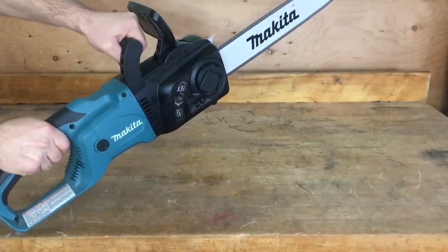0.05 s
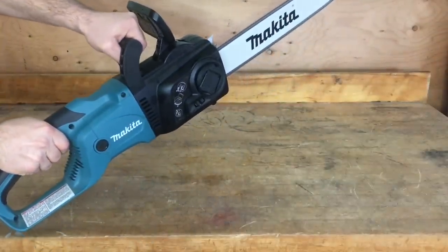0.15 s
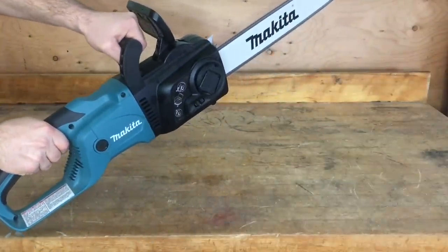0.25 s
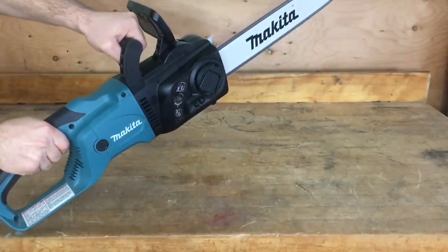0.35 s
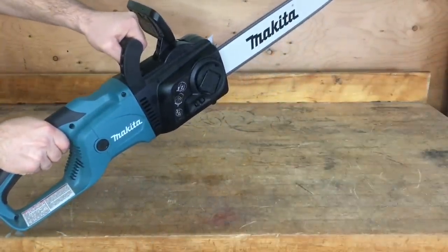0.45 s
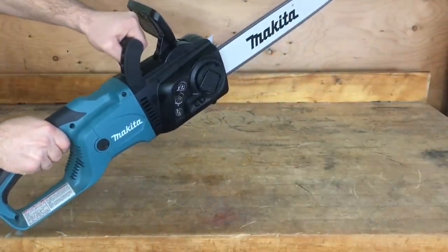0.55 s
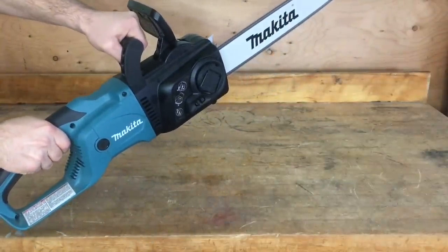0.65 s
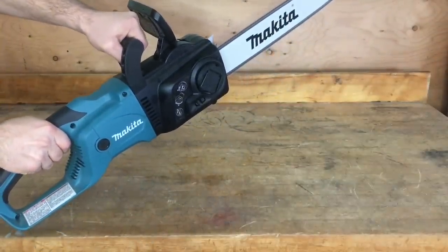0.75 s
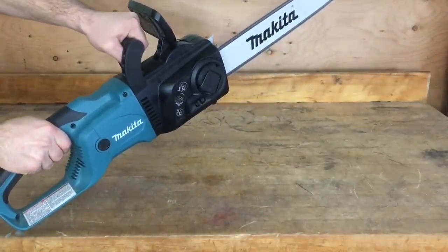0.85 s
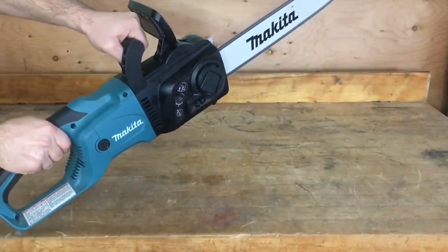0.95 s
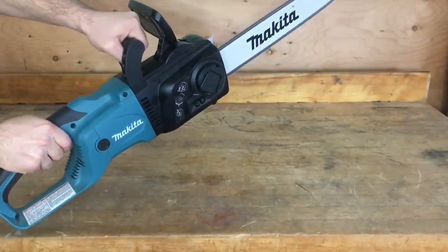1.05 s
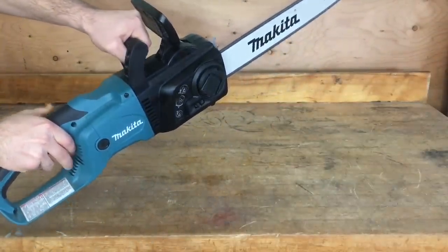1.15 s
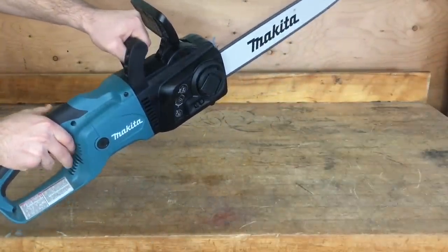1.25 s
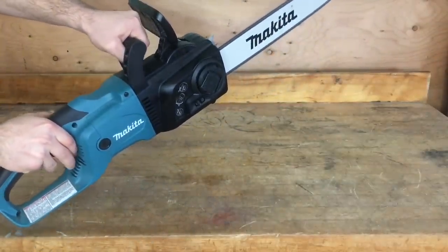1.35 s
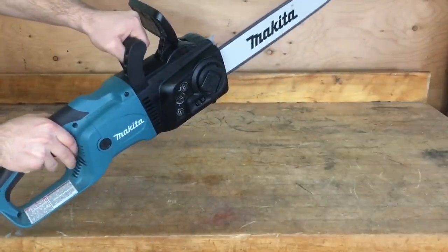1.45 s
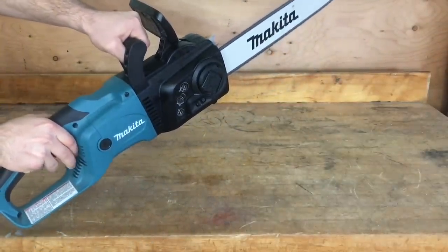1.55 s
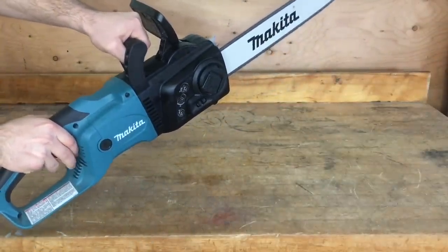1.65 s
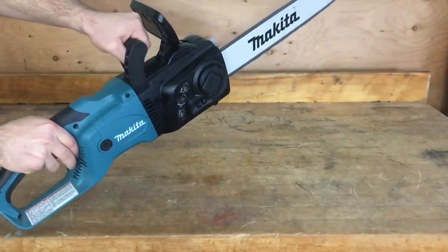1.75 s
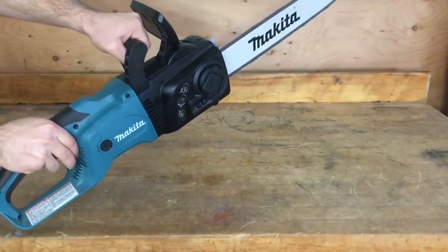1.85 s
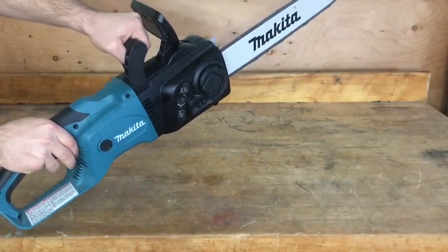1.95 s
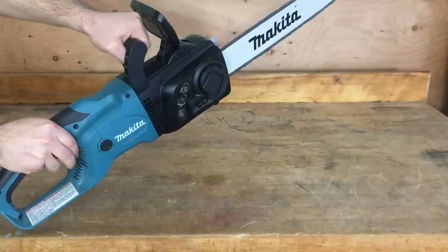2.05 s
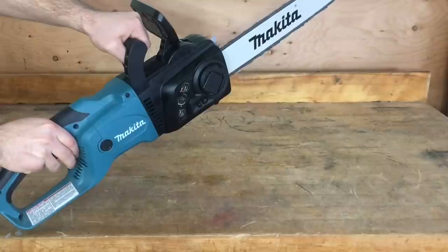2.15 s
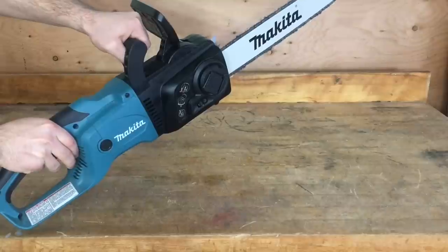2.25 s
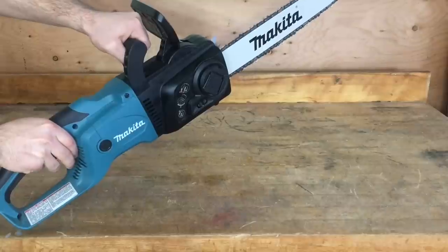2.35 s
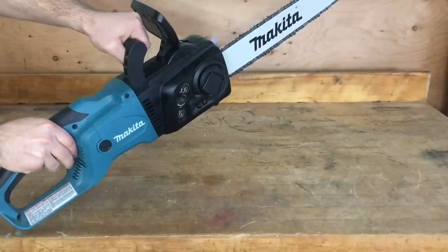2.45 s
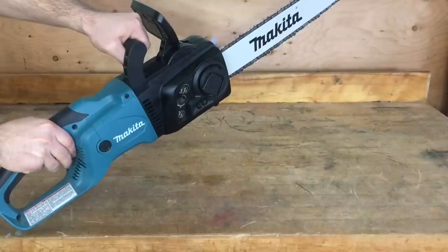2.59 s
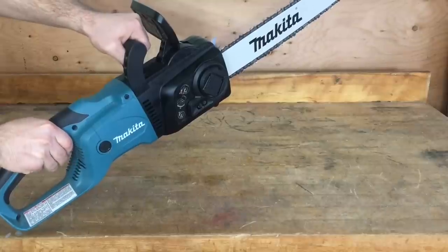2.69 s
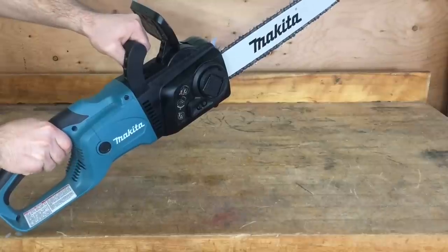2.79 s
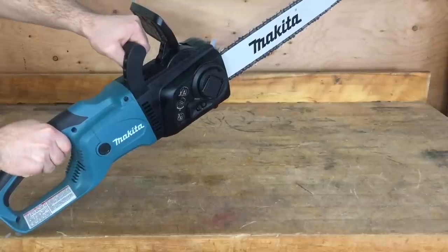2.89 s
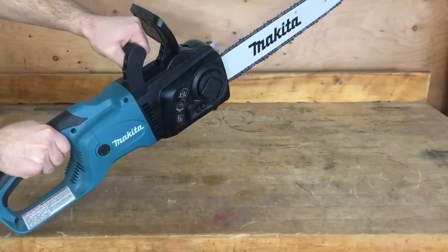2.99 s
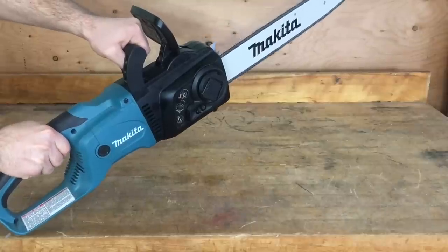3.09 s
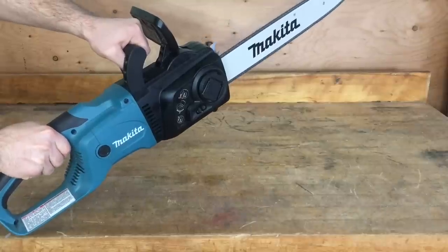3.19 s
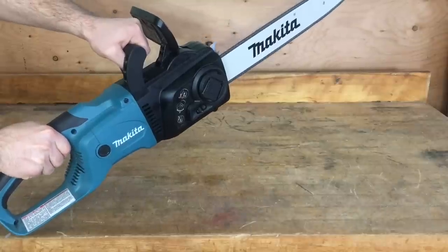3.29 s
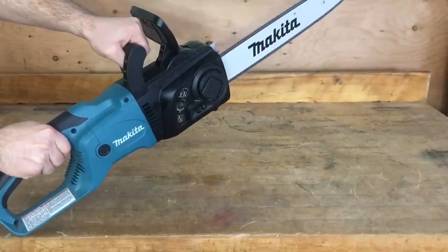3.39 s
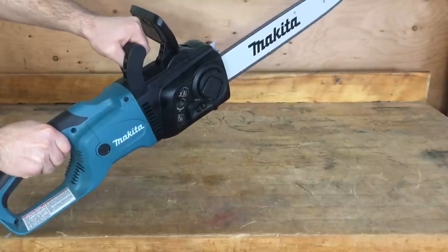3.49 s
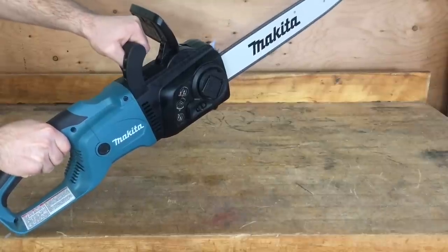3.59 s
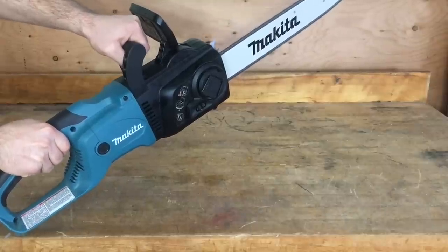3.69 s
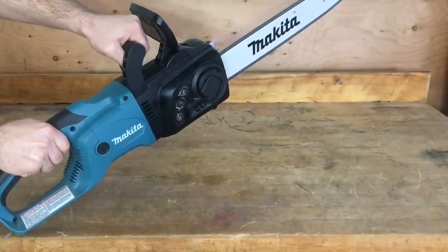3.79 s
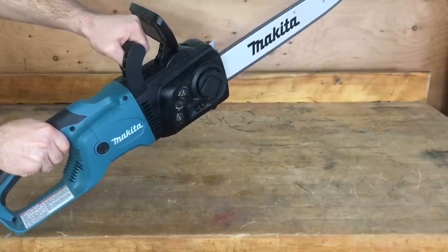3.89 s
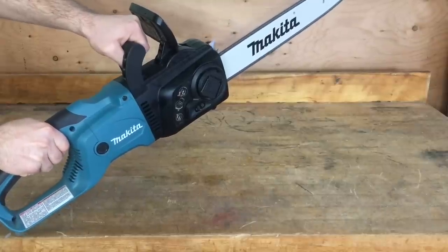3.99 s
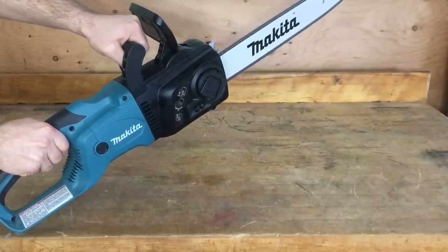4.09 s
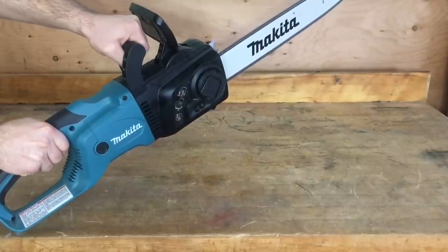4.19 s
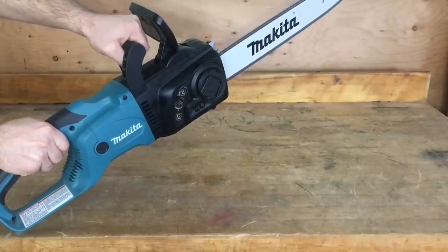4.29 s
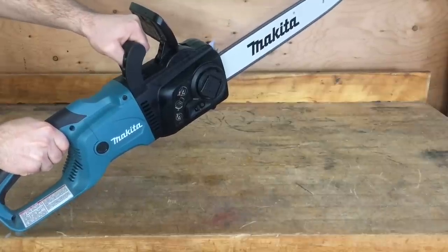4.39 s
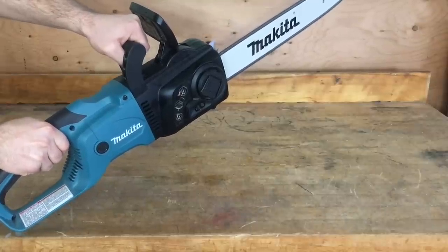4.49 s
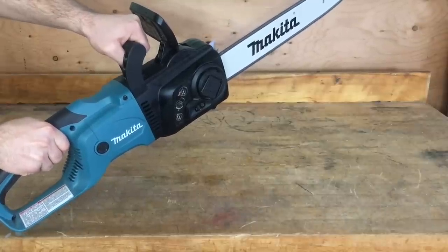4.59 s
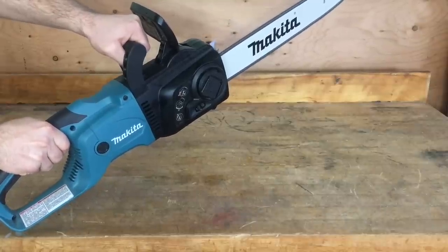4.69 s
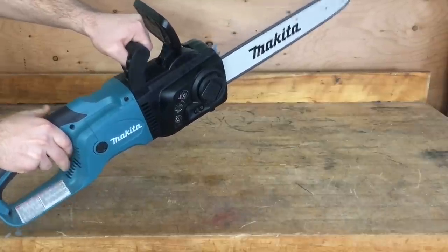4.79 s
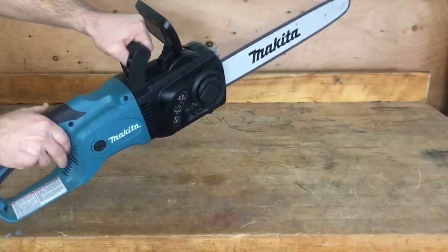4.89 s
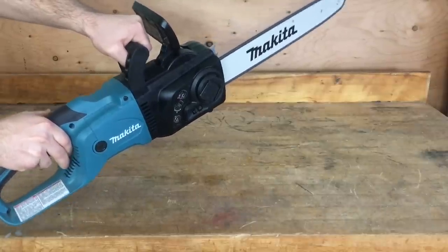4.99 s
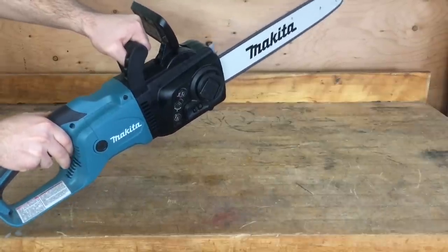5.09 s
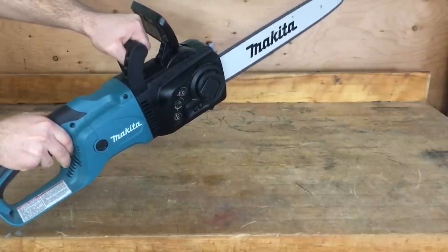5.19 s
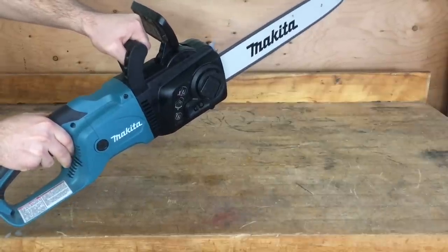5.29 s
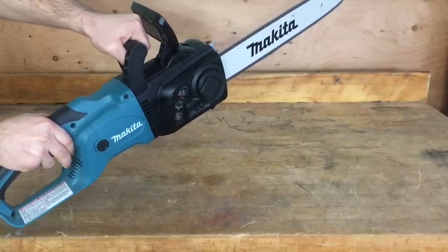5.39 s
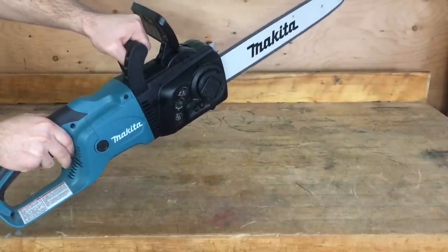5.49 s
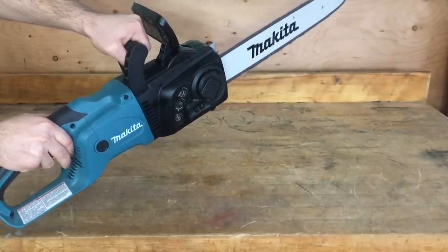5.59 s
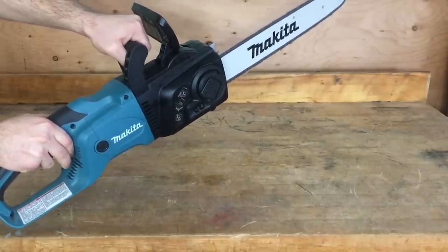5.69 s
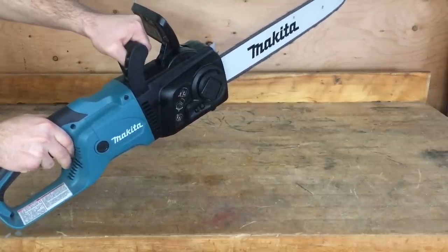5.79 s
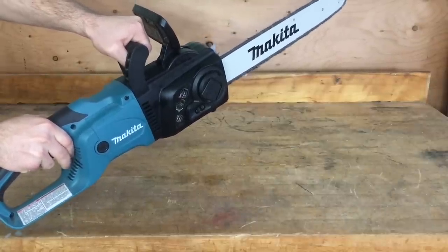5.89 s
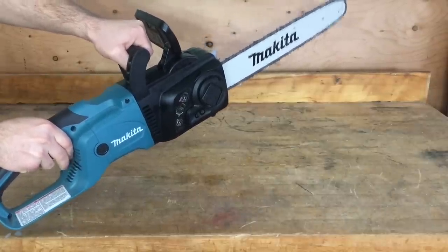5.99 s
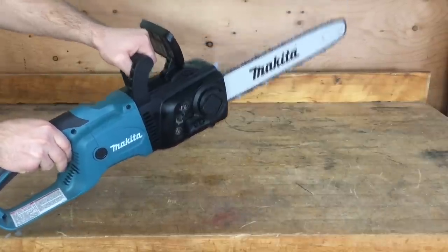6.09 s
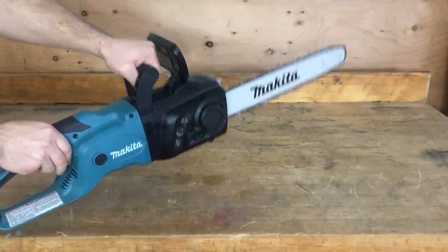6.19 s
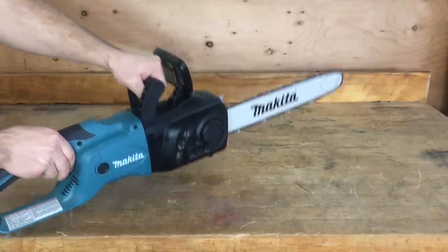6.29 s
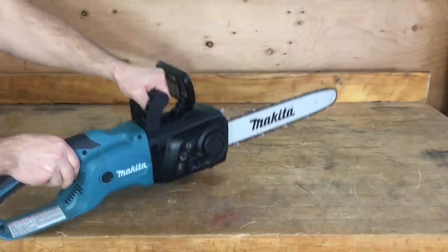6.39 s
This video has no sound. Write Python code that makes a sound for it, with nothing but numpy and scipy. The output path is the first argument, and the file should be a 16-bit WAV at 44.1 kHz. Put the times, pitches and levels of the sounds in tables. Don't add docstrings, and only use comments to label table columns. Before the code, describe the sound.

An electric chainsaw roars at full power from the first instant, close up in a small wooden workshop. On release a knock and short brake squeal pull the pitch down; the chain rattles slower into separate steel clacks and stops. Over faint room hum, a trigger click and slack chain knocks lead into a growling restart, rising roar, and a second braked stop.

```python
import sys
import numpy as np
from scipy import signal
from scipy.fft import rfft, irfft
from scipy.io import wavfile

SR = 44100
rng = np.random.default_rng(int(sys.argv[2]) if len(sys.argv) > 2 else 0)


def master_out(mix):
    frames = np.transpose(np.atleast_2d(mix))
    ceiling = np.clip(frames, -1, 1)
    pcm = np.round(ceiling * 32767).astype(np.int16)
    wavfile.write(sys.argv[1], SR, pcm)


def how_loud(loudness_db):
    steps = np.asarray(loudness_db, float) / 20
    return 10 ** steps


N = 284445

# full power [t/s], release [t/s], coasting stretch [ratio]
RUNS = [
    (-.0984, 1.15, 1.0),
    (3.5717, 4.8, 1.04),
]
# [f/Hz], [width/Hz], [lift/dB]
BODY = [(826, 25, 5), (867, 25, 7), (912, 25, 5), (1065, 40, 3), (1315, 40, 5), (1820, 40, 4),
        (2110, 40, 5), (2335, 60, 8), (2520, 40, 3), (2650, 40, 5), (2840, 40, 4), (3060, 60, 4),
        (3225, 50, 5), (3340, 50, 7), (3460, 50, 5), (4000, 220, 6), (4700, 700, -5), (6200, 500, 2.1),
        (9100, 1200, 3.1), (10500, 700, -4), (11900, 600, 2.1)]
# [f/Hz], [level/dB]
FLAT = [(10, 0), (20000, 0)]

SOFT_START_S, SOFT_TURNS_PER_S, TOP_TURNS_PER_S = .57, 222, 394.7
LINKS_PER_TURN = .972
FRESH_S = .12


def rms_one(x):
    return x / np.sqrt(np.mean(x ** 2) + 1e-20)


def drift(rate_hz):
    r = np.exp(-2 * np.pi * rate_hz / SR)
    slow = signal.lfilter([1], [1, -2 * r, r * r], rng.standard_normal(N + SR))
    return rms_one(slow[SR:])


def along(rows, x):
    first, *columns = np.transpose(rows)
    return [np.interp(x, first, column) for column in columns]


def butter(x, order, hz, kind="band"):
    return signal.sosfilt(signal.butter(order, hz, kind, fs=SR, output="sos"), x)


def colour(x, spectrum, peaks=(), depth=1):
    size = 2 ** 19
    hz = np.arange(size // 2 + 1) * SR / size + 1
    corner_hz, corner_db = np.transpose(spectrum)
    level_db = np.interp(np.log(hz), np.log(corner_hz), corner_db)
    for centre_hz, width_hz, lift_db in peaks:
        level_db = level_db + depth * lift_db / (1 + (2 * (hz - centre_hz) / width_hz) ** 2)
    cepstrum = irfft(np.log(how_loud(level_db)))
    cepstrum[1:size // 2] *= 2
    cepstrum[size // 2 + 1:] = 0
    return irfft(rfft(x, size) * np.exp(rfft(cepstrum)))[..., :N]


def split(x):
    shell_hz, hiss_hz = 1700, 4800
    bands = butter(x, 4, shell_hz, "low"), butter(x, 4, [shell_hz, hiss_hz]), butter(x, 4, hiss_hz, "high")
    return [rms_one(band) for band in bands]


def bursts(clicks, t60_s):
    envelope = signal.lfilter([1], [1, -how_loud(-60 / (t60_s * SR))], clicks + 1e-18)
    return envelope * rng.standard_normal(N)


def motion():
    # since release [t/s], share of speed at release [ratio]
    coast = [
        (0, 1),
        (.03, .865),
        (.07, .71),
        (.15, .505),
        (.25, .41),
        (.4, .345),
        (.78, .135),
        (1.05, .05),
        (1.2, .013),
    ]
    # since full power [t/s], [level/dB]
    pull = [
        (-.72, -89),
        (-0.618, -88),
        (-0.495, -55.5),
        (-0.435, -36.5),
        (-0.291, -20),
        (-0.082, -15),
        (.1, -11),
        (0.36, -12.5),
        (0.84, -15),
    ]
    # since release [t/s], [level/dB]
    fade = [
        (0, 0.5),
        (.06, -4),
        (.17, -11.5),
        (.42, -18),
        (.8, -23.5),
        (1.0, -31.5),
        (1.15, -43.5),
        (1.2, -43),
        (1.26, -72.5),
    ]
    surge, surge_s, climb_s, soft_bend, fresh_db = .103, .0825, .367, .92, 1
    t = np.arange(N) / SR
    second_run = t > RUNS[1][0] + pull[0][0]
    full, release, stretch = np.transpose(RUNS)[:, second_run.astype(int)]
    on = np.minimum(t, release) - full
    off = np.maximum(t - release, 0) / stretch
    ramp = SOFT_TURNS_PER_S * np.clip(1 + on / SOFT_START_S, .02, 1) ** soft_bend
    lag = surge * np.exp(-on / surge_s) + (1 - surge) * np.exp(-on / climb_s)
    climb = TOP_TURNS_PER_S - (TOP_TURNS_PER_S - SOFT_TURNS_PER_S) * lag
    turns = np.where(on < 0, ramp, climb) * along(coast, off)[0]
    level_db = along(pull, on)[0] + along(fade, off)[0] + fresh_db * np.exp(-t / FRESH_S)
    return on, off, turns, level_db


def band_levels(on, off, turns, level_db):
    # speed [turns/s], lower [level/dB], upper [level/dB]
    tilt = [
        (5, 5.5, -2.5),
        (50, 3, -7.5),
        (110, -2.5, -5),
        (199, -9, -6.5),
        (280, -13.5, -9.5),
        (390, -17, -13.5),
    ]
    lower_db, upper_db = along(tilt, turns)
    stall_db = 18.5 * np.exp(-np.maximum(on + SOFT_START_S, 0) / .13)
    growl_db = np.clip(-on / 0.17, 0, 1)
    settling_db = 3 * np.exp(-np.arange(N) / SR / FRESH_S)
    brake = (1 - np.exp(-off / 0.024)) * np.exp(-off / 0.67)
    lower_db = level_db + lower_db + stall_db + growl_db + 1.5 * brake
    upper_db = level_db + upper_db + stall_db + settling_db + 7 * brake
    return lower_db, upper_db, level_db


def roar(turns, levels_db):
    # [f/Hz], [density/dB]
    air_spectrum = [(47, -75), (80, -35.5), (242, -22), (370, -13), (800, -8), (1400, -7.5), (2500, -5.5),
                    (3400, -3), (4200, -7.5), (5600, -5), (7500, -3.5), (9300, 0), (13000, 0), (15800, -1)]
    # [f/Hz], [density/dB]
    chain_spectrum = [(47, -64.5), (80, -39.5), (383, -19), (665, -9.0), (759, -6.5), (829, -6.0),
                      (1800, -9.5), (2290, -3.5), (3050, -1.5), (3330, -2.0), (4950, -15), (6040, -12.5),
                      (10700, -18.5), (14300, -7.0), (15600, -8), (20000, -32.5)]
    # [f/Hz], [density/dB]
    steel_spectrum = [(4500, -9), (7000, -19), (9000, -1.5), (11000, -2), (13500, -1), (15800, 5)]
    ring = 1.25
    links_hz = LINKS_PER_TURN * np.maximum(turns, 20)
    passing = np.diff(np.floor(np.cumsum(links_hz * how_loud(1.5 * drift(60))) / SR), prepend=0)
    rattle = rng.random(N) < 1.5 * links_hz / SR
    even = 1 / np.sqrt(links_hz)
    thuds = passing * how_loud(2.2 * rng.standard_normal(N)) * even
    tap_amp = how_loud(2.8 * np.minimum(rng.exponential(1, N), 4))
    taps = (0.76 * passing + 0.55 * rattle) * tap_amp * even
    housing = split(colour(bursts(thuds, 0.016), chain_spectrum, BODY, depth=ring))[:2]
    steel = split(colour(bursts(taps, 0.0022), steel_spectrum, BODY))[2:]
    rub = split(colour(rng.standard_normal(N), chain_spectrum, BODY, depth=ring))
    air = split(colour(rng.standard_normal(N), air_spectrum, BODY, depth=0.77))
    blown = 1 / (1 + (255 / np.maximum(turns, 1)) ** 5)
    clear = np.clip((turns - 35) / 45, 0, 1)
    out = 0
    for db, stream, contact, friction, share in zip(levels_db, air, housing + steel, rub, (.55, .45, .6)):
        struck = share * clear
        chain = np.sqrt(struck) * contact + np.sqrt(1 - struck) * friction
        mixed = np.sqrt(blown) * stream + np.sqrt(1 - blown) * chain
        out = out + how_loud(db + 1.1 * drift(3.3)) * mixed
    return out


def song(on, off, turns, level_db):
    slow_db = 3.1 * np.minimum(turns - 220, 0)
    blade_db = -26.5 + slow_db + .15 * np.minimum(turns - 285, 0) - 691 * off
    load = np.clip((TOP_TURNS_PER_S - turns) / 110, 0, 1) ** 2
    pulling_db = -49 + 21.5 * load + 55 * np.log10(np.minimum(turns / 200, 1))
    rise_s, squeal_s = .06, .17
    braking_db = -31 - 55 * np.maximum(off - rise_s, 0)
    braking_db = braking_db - 450 * np.maximum(off - squeal_s, 0) - 250 * np.maximum(rise_s - off, 0)
    slot_db = np.where(off > 0, braking_db, pulling_db)
    link_db = level_db - 19.5 + 0.22 * slow_db
    early = np.maximum(-on - SOFT_START_S + .16, 0)
    buzz_db = -54 - 110 * early - 400 * early ** 2
    buzz_db = buzz_db - 9.5 * np.clip(on / .05, 0, 1) - 18 * np.maximum(on + 5 * off, 0)
    bite_db = np.where(off > .01, -30.5 - 600 * np.maximum(off - 0.032, 0), -120)
    return blade_db, slot_db, link_db, buzz_db, bite_db


def whine(turns, blade_db, slot_db, link_db, buzz_db, bite_db):
    # multiple of link rate [ratio], [level/dB]
    chain_orders = [(1, -19), (2, -3), (3, -8), (4, -4), (6, -9.5), (8, -7)]
    # multiple of twice the mains [ratio], [level/dB]
    buzz_orders = [(1, 0), (2, 1), (3, 8), (4, 8), (7, 17)]
    slot_count, blade_count, mains_hz = 12, 38, 60
    phase = 2 * np.pi * np.cumsum(turns) / SR
    blades = how_loud(blade_db + 3.6 * drift(25)) * np.sin(blade_count * phase + 0.34 * drift(40))
    slots = how_loud(slot_db + 4.0 * drift(25)) * np.sin(slot_count * phase + .9 * drift(50))
    bite = how_loud(bite_db) * np.sin(slot_count / 2 * phase + .4 * drift(40))
    links = 0
    for k, db in chain_orders:
        link_amp = how_loud(link_db + db + 2.5 * drift(25))
        links = links + link_amp * np.sin(k * LINKS_PER_TURN * phase + 0.13 * drift(1.8))
    mains_phase = 4 * np.pi * mains_hz * np.arange(N) / SR
    buzz = sum(how_loud(buzz_db + db) * np.sin(k * mains_phase) for k, db in buzz_orders)
    return np.sqrt(2) * (blades + colour(links + slots + bite, FLAT, BODY) + buzz)


def workshop(x):
    t60_s, room_db = 0.36, -11.5
    t = np.arange(SR // 2) / SR
    tail = rng.standard_normal(len(t)) * how_loud(-60 * t / t60_s) * (t > .004)
    tail = signal.lfilter([1], [1, -.3], tail)
    return how_loud(room_db) * signal.fftconvolve(x, tail / np.sqrt(np.sum(tail ** 2)))[:N]


def room_tone(on, off):
    # [f/Hz], [density/dB]
    hum_spectrum = [(13, -32.5), (22, -5.5), (49, -6.5), (76, -20.5), (125, -14), (147, -18.5), (255, -17),
                    (292, -13), (317, -22), (467, -21.5), (705, -41), (1850, -52), (15800, -41)]
    # [f/Hz], [width/Hz], [lift/dB]
    hum_lines = [(46.4, 8, 3), (119, 4.2, 0.5), (286, 16, -1.5)]
    # [f/Hz], [density/dB]
    hiss_spectrum = [(290, -36), (500, -1), (706, -1), (770, -3), (1880, -17.5), (2620, -12.5),
                     (15600, -18.5)]
    tone_db, hiss_db, duck_db_per_s, hold_s, back_s = -68, -70, 9.5, 0.28, 0.35
    held_s = np.maximum(on, 0) + np.minimum(off, hold_s)
    level_db = tone_db - duck_db_per_s * held_s * np.clip(1 - (off - hold_s) / back_s, 0, 1)
    rumble = butter(colour(rng.standard_normal(N), hum_spectrum, hum_lines), 2, [36, 600])
    hiss = colour(rng.standard_normal(N), hiss_spectrum)
    return how_loud(level_db + 5.0) * rms_one(rumble) + how_loud(hiss_db) * rms_one(hiss)


def ticks():
    # [t/s], peak [level/dB],
    # brightness [level/dB]
    link_ticks = [(1.3754, -24, -15), (1.4314, -18, -4), (1.6652, -19, -11), (1.7255, -26, -6.5),
                  (1.7794, -27, -8.5), (1.8846, -23, -8), (1.8956, -14.5, -17.5), (1.9385, -26, -14),
                  (2.0512, -27, -21.5), (2.1068, -19, -11), (2.1899, -10, -16.5), (2.241, -9, -13.5),
                  (2.3096, -14.5, -16.5), (2.4967, -45, -34), (2.5437, -58, -7), (5.2884, -21, -5),
                  (5.4144, -19.5, -7), (5.5588, -23, -4), (5.6935, -19, -11), (5.7364, -19, -10),
                  (5.7636, -24, -5.5), (5.8, -14.5, -10), (5.8391, -25, -7), (5.88, -14, -12),
                  (5.9264, -10, -10), (5.985, -11.5, -9.5), (6.149, -53, -13)]
    # [t/s], peak [level/dB], brightness [level/dB]
    trigger_ticks = [
        (2.8514, -20, -26),
        (2.9908, -42, -12),
        (3.0066, -50, -7.5),
        (3.016, -43, -9),
        (3.0305, -52.5, -11.5),
        (3.0679, -45.5, 4.5),
        (3.1033, -19.5, -10),
        (3.1308, -27.5, -8.5),
        (3.1507, -13, -10),
    ]
    out, t = np.zeros((2, N)), np.arange(4096) / SR
    crack_s = .0006
    crack = t / crack_s * np.exp(1 - t / crack_s)
    rows = [*link_ticks, *trigger_ticks]
    for (s, db, bright_db), noise in zip(rows, rng.standard_normal((len(rows), 4096))):
        at = round(s * SR)
        ring_db = min(-12 - 0.24 * (db + 19.5), -6)
        puff = how_loud(db) * (crack + how_loud(ring_db - 60 * t / 0.19)) * noise
        out[:, at:at + 4096] += puff * [[1], [how_loud(bright_db)]]
    lower = butter(out[0], 4, [5800, 11000])
    upper = butter(out[1], 4, 11000, "high")
    steel = colour(how_loud(-12.5) * lower + upper, [(10, 0.0032), (20000, 0.021)], BODY)
    return steel + how_loud(-13.5) * np.roll(steel, round(0.0051 * SR))


def knocks():
    # [t/s], peak [level/dB], brightness [level/dB]
    housing_knocks = [(1.724, -22.5, -17), (1.92, -28, -16), (1.965, -30, -20), (1.99, -28, -12),
                      (2.043, -25.5, -25), (2.105, -21.5, -14), (2.145, -23, -27), (2.192, -27.5, -40),
                      (2.223, -26, -10), (2.245, -30.5, -22), (2.268, -31, -15), (2.296, -27.5, -13),
                      (2.497, -54, -7), (2.826, -59, -20), (2.852, -41, 5.5), (2.901, -39, -36),
                      (3.032, -30.5, -20), (3.115, -20, -5), (3.157, -22.5, -0.5), (3.186, -13, -12),
                      (5.725, -23, -12), (5.698, -22.5, -4), (5.765, -25.5, 0.5), (5.801, -27, -4),
                      (5.832, -27, -7), (5.874, -30, -5), (5.894, -35, -3), (5.922, -26, -7),
                      (5.975, -30, -15), (5.988, -33.5, -4)]
    brake_knocks = [(release + 0.018, -17.5, 1) for _, release, _ in RUNS]
    s, low_db, bright_db = np.transpose([*housing_knocks, *brake_knocks])
    at, out = (s * SR).astype(int), 0
    for db, band_hz, t60_s in ((low_db, [520, 1900], .05), (low_db + bright_db, [2000, 4500], .03)):
        clicks = np.zeros(N)
        clicks[at] = how_loud(db + 6.5)
        out = out + butter(bursts(clicks, t60_s), 2, band_hz)
    return colour(out, FLAT, BODY, depth=.6)


def scene():
    on, off, turns, level_db = motion()
    saw = roar(turns, band_levels(on, off, turns, level_db))
    saw = saw + whine(turns, *song(on, off, turns, level_db))
    saw = saw + ticks() + knocks()
    return np.tile(saw + workshop(saw) + room_tone(on, off), (2, 1))


def noise_fills(mono):
    edges_hz = [4300, 5600, 7000, 8800, 10300, 11700, 13400, 15800]
    count, frame = 20, 2048
    side, hz = np.zeros(N), np.arange(frame // 2 + 1) * SR / frame
    places, noises = rng.random((count, 2)), rng.standard_normal((count, frame))
    for k, ((when, band), noise) in enumerate(zip(places, noises)):
        full, release, _ = RUNS[k % 2]
        start = max(full, 0)
        at = int((start + when * (release - start)) * SR)
        low = int(band ** .7 * (len(edges_hz) - 1))
        inside = (hz > edges_hz[low]) & (hz < edges_hz[low + 1])
        level = np.std(irfft(rfft(mono[at:at + frame]) * inside))
        fill = rms_one(irfft(rfft(noise) * inside)) * np.hanning(frame) ** .5
        side[at:at + frame] += how_loud(-6.5) * level * fill
    return side


def low_pass(x):
    return signal.sosfilt(signal.butter(12, 16740, fs=SR, output="sos"), x)


def record(dry):
    parted = dry + noise_fills(dry[0]) * [[1], [-1]]
    edge = signal.firwin(1601, 15780, window=("kaiser", 8), fs=SR)
    cut = signal.fftconvolve(parted, edge[None], mode="same")
    return low_pass(np.clip(cut, -1, 1))


dry = scene()
out = record(dry)
master_out(out)
```